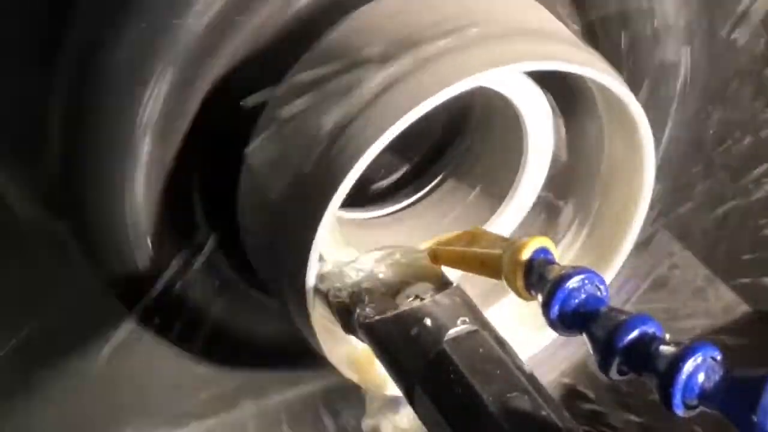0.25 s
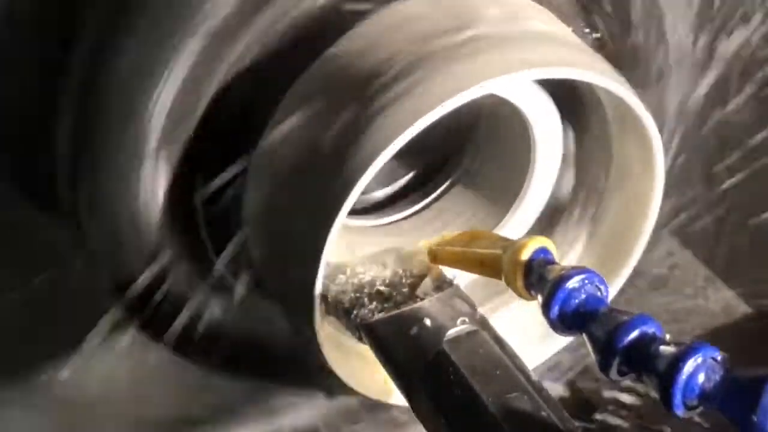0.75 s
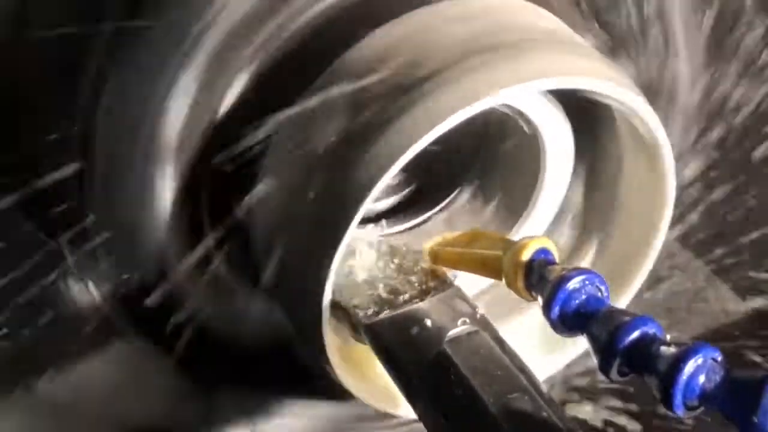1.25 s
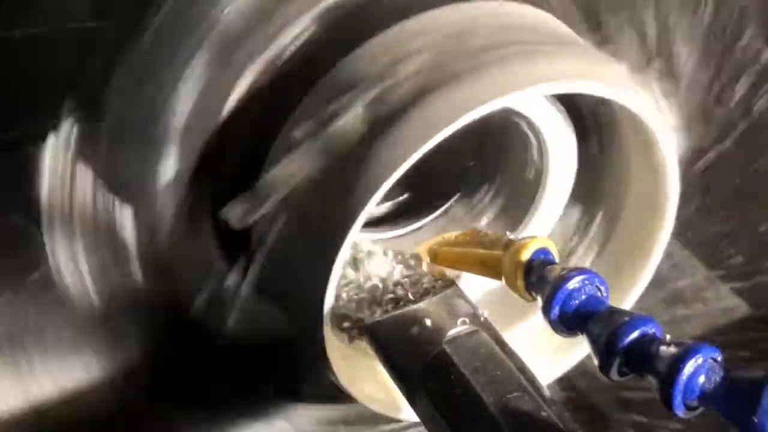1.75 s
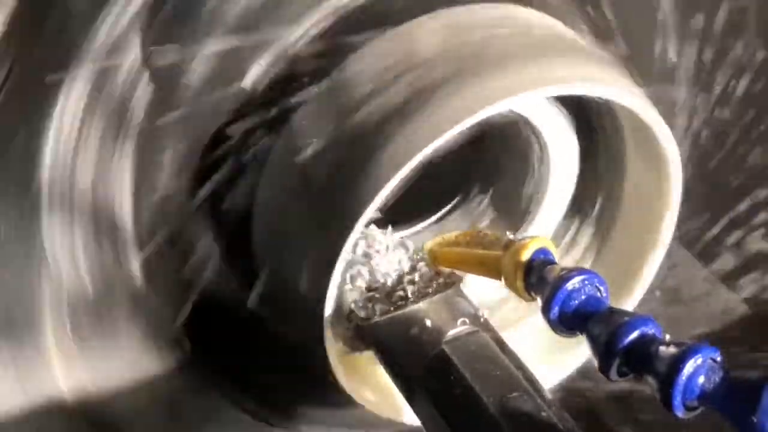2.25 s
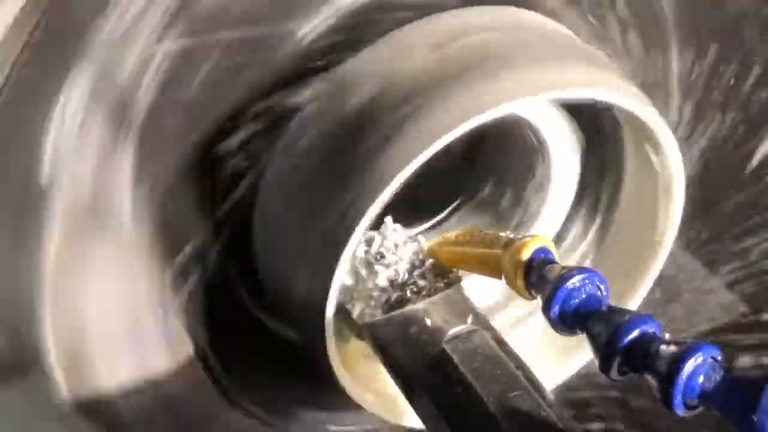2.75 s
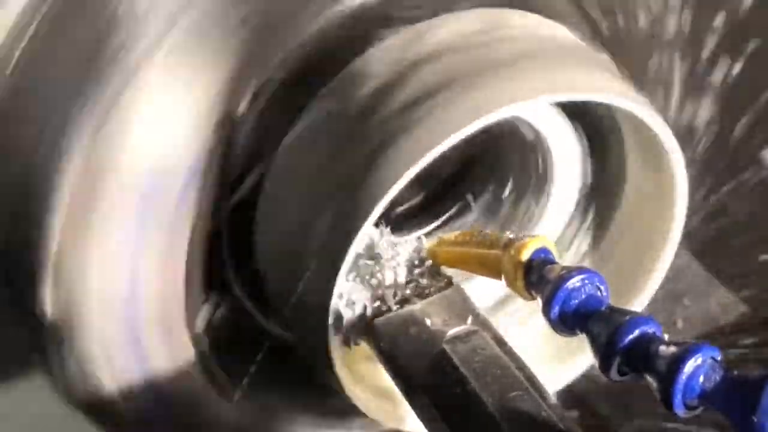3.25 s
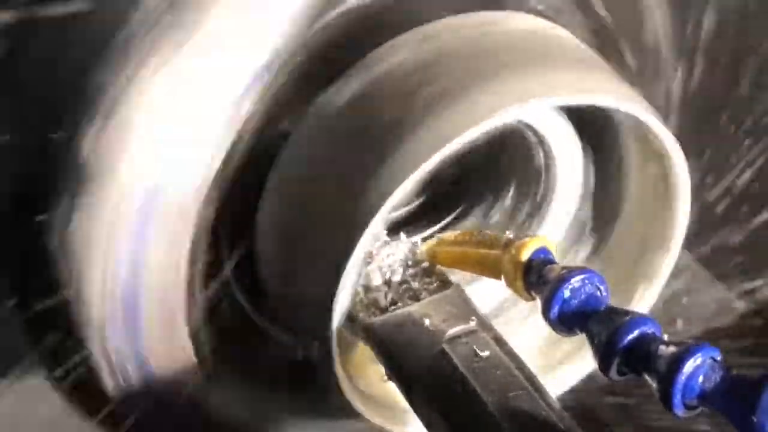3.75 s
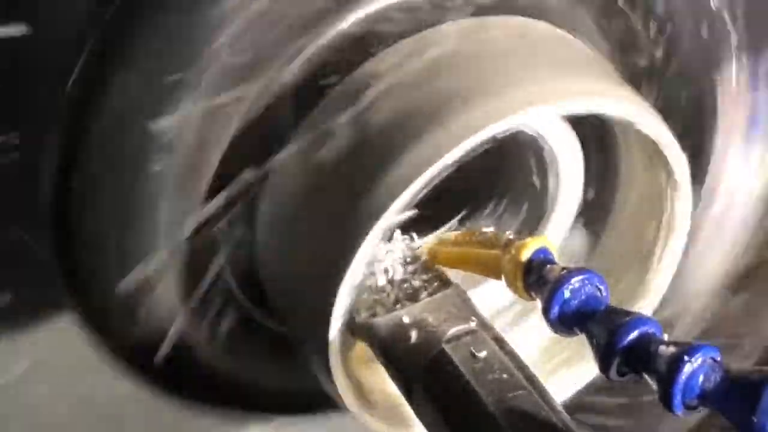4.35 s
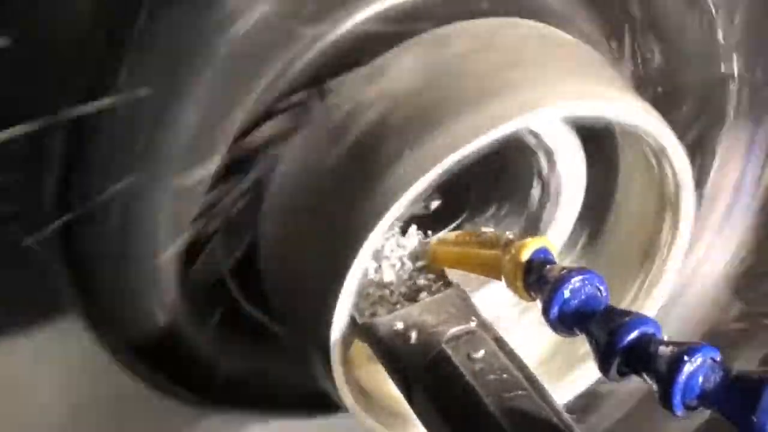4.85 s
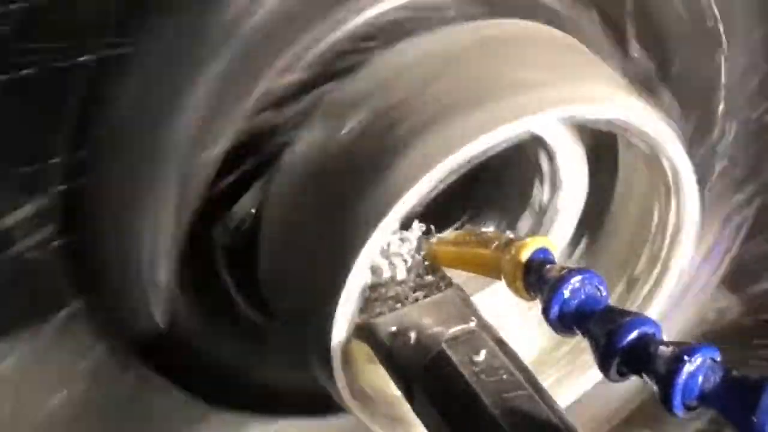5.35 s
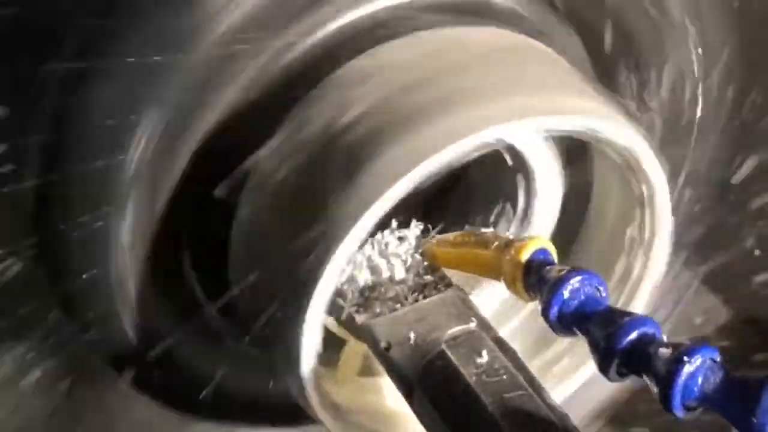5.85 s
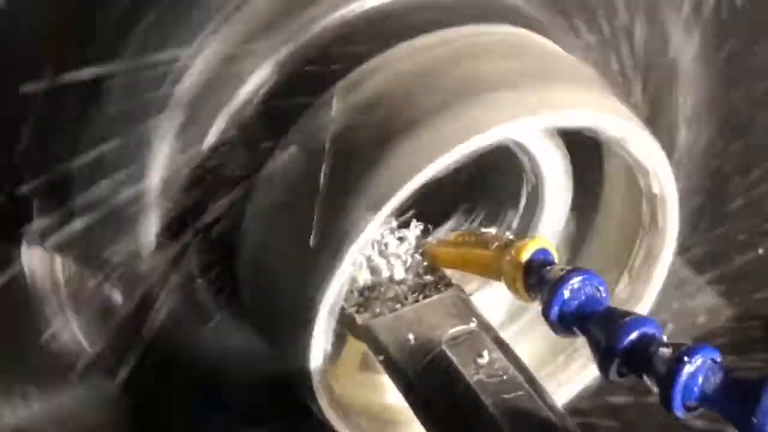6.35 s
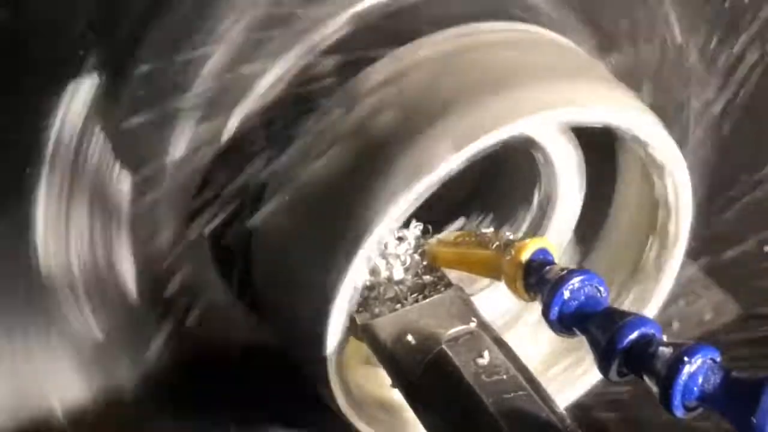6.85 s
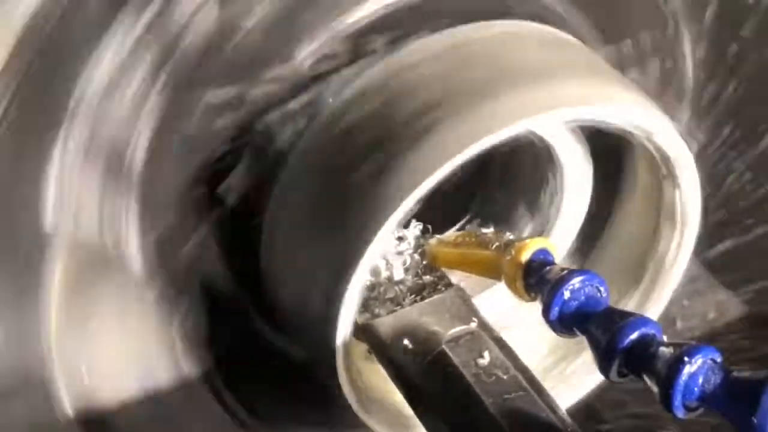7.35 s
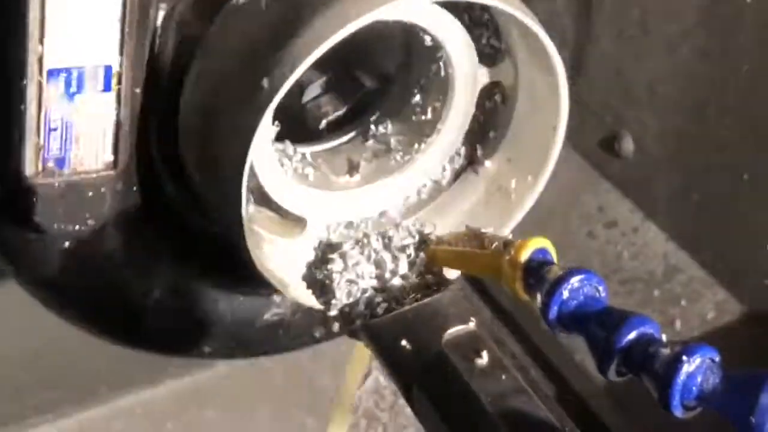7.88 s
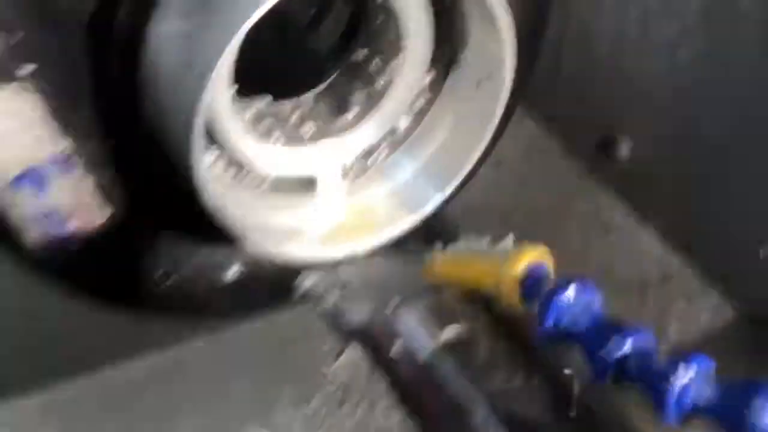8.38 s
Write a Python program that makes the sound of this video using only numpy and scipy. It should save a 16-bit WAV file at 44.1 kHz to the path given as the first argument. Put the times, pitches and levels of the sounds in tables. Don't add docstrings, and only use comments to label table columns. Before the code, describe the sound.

A cutting tip rasps fast inside a spinning metal ring, stuttering and surging, then a thin whistling chatter note rises near the end above machine hum.

```python
import sys
import numpy as np
from scipy import signal
from scipy.fft import rfft, irfft
from scipy.io import wavfile
from scipy.ndimage import uniform_filter1d

SR = 44100
rng = np.random.default_rng(int(sys.argv[2]) if len(sys.argv) > 2 else 0)


def dump(signal):
    limited = np.clip(np.atleast_2d(signal).T, -1, 1)
    pcm = np.round(limited * 32767).astype(np.int16)
    wavfile.write(sys.argv[1], SR, pcm)


def how_loud(loudness_db):
    steps = np.asarray(loudness_db, float) / 20
    return 10 ** steps


N = 380141
T = np.arange(N) / SR
TURN = 1579

# [t/s, cut level/dB, skip depth/dB, angle of renewed bite/turns]
FEED_CURVE = [(0, -28, 2.5, .85), (.3, -24.8, 3.5, .75), (.6, -26.2, 2.5, .6), (1.5, -27, 28, .97),
              (2.0, -27, 18, .91), (2.5, -24.8, 15, .8), (3.3, -27, 14, .74), (3.47, -26.5, 2.2, .55),
              (4.1, -23.8, 2.5, .55), (4.4, -27.5, 3, .58), (5.07, -31.3, 2.2, .48), (5.13, -28.5, 3, .46),
              (5.52, -25.1, 2.6, .51), (5.78, -27, 3, .55), (6.95, -28.6, 1.5, .6), (7.35, -33.5, 3, .45),
              (8.0, -32, 2.2, .39), (8.62, -25.5, 3, .48)]
# [middle t/s, half length/s, level/dB, extra skip/dB, later bite/turns]
SLACKENINGS = [(1.905, .045, -11, .1, .05), (2.745, .105, -5.5, 7.5, .21), (3.42, .04, -2.2, 9, .1),
               (4.235, .075, -6.5, 19, .44), (4.46, .04, -3, 1.2, .03), (4.605, .04, -2.2, 12, .1),
               (4.725, .05, -2.2, 10, .03), (5.875, .085, -10.5, 13, .52), (5.96, .07, -4.5, .1, .15),
               (6.375, .045, -4.5, 17, .1), (7.05, .05, -2.2, 1.2, .1), (7.48, .06, -4, .1, .2),
               (7.722, .06, -6.5, .1, .05)]
# [middle t/s, half length/s, level/dB, extra skip/dB]
DIGS = [(.634, .022, 6.5, .1), (.669, .022, 6, -7), (1.54, .065, 8.5, .1), (1.645, .03, 4.5, .1),
        (1.83, .07, 11.3, -10), (3.0, .195, 6.5, -2.2), (3.1, .06, .3, 5), (3.328, .05, 8, -5),
        (4.53, .07, 5, 5), (6.255, .265, 4.3, .6), (6.305, .06, 4, 8), (7.18, .1, 1.5, .1),
        (7.6, .11, 3, 1.2), (8.59, .13, 6, .6)]
# [start t/s, end t/s, depth/dB]
BACK_OFFS = [
    (.68, 1.525, 40),
    (1.685, 1.822, 30),
    (3.148, 3.29, 25),
    (4.61, 4.695, 15),
    (6.453, 6.497, 15),
]
# [middle t/s, depth/dB]
CHIP_JAMS = [
    (5.792, 11),
    (7.1024, 13),
    (7.2455, 17),
    (7.3164, 15),
    (7.3518, 11),
    (7.6022, 8),
    (7.6726, 11),
    (8.2009, 6),
]
# [t/s, thinness/-1..1, repeating share of scrape/0..1, freedom from packed chips/-1..1]
WALL_CURVE = [(0, -.3, .4, .9), (.6, -.25, .35, .45), (1.55, -.99, .6, -.99), (1.85, -.8, .6, -.45),
              (2.1, -.25, .99, -.15), (2.7, -.15, .95, -.23), (2.87, -.2, .4, -.23), (3.35, .01, .4, .1),
              (3.6, .15, .87, .4), (4.1, -.4, .75, .3), (4.5, -.5, .6, -.1), (4.85, -.1, .96, .95),
              (5.45, .2, .8, .7), (6.05, -.48, .36, -.05), (6.4, -.4, .45, -.3), (6.68, .85, .95, .99),
              (8.33, .95, .97, .99), (8.62, .01, .7, -.46)]
# [f/Hz, width/Hz,
# level/dB]
RING_MODES = [(787, 15, -2.5), (845.8, 7.6, 1.5), (988, 47, -0.5), (1254, 77, 0), (1405, 36.5, 3),
              (1705, 24, 1.2), (2381, 46, -1)]
# [f/Hz, width/Hz, level/dB]
BAR_MODES = [(3005, 45, -5), (3245, 55, -1), (3430, 65, -1.5), (3770, 50, -6), (4250, 60, -4),
             (4400, 90, -2), (4730, 60, -6), (4900, 120, -1), (5130, 170, -4), (5560, 60, -9),
             (6320, 110, -5), (7140, 80, -4)]
# [f/Hz, width/Hz, level/dB]
TIP_MODES = [(7820, 240, -3), (8430, 260, -1), (9280, 146, 1), (10340, 170, -0.5), (11700, 160, -12),
             (13820, 140, 1.5), (14100, 330, 0.5), (16200, 320, 1)]
# [f/Hz, width/Hz, level/dB]
POST_MODES = [(500, 30, -7.5), (680, 23, 2), (1884, 65, -7.5), (2372, 46, 3.5)]
# [f/Hz, density/dB per Hz]
RUB_SPECTRUM = [(500, -43), (1200, 2), (2200, -13.5), (2800, -7), (3300, -1.5), (5200, 4), (5900, -2.5),
                (7000, 1), (9000, -14), (12300, -13), (15500, -7)]
# [f/Hz, depth/0..1, angle/turns]
BEAMING = [(1200, .2, .9), (1700, .4, .4), (2380, .3, .5), (3005, .6, .55), (3245, .4, .2), (3430, .5, .2),
           (3770, .5, .85), (4300, .45, .62), (4900, .7, .83), (5150, .6, .95), (5560, .4, .1),
           (6320, .3, .05), (7140, .7, .62), (8200, .15, 0), (9250, .6, .35), (10300, .5, .55),
           (14000, .25, 0)]
# [f/Hz, gain/dB]
THINNING_GAIN = [(3000, 1), (3250, 6), (3430, -3), (3770, 1), (4300, -6), (4720, 5), (4900, -3), (5200, 3),
                 (6320, 1.5), (7140, -4)]
# [t/s, level/dB]
CHATTER_CURVE = [(7.05, -56), (7.162, -40), (7.264, -46), (7.39, -32.5), (7.67, -25), (7.79, -27.5),
                 (7.95, -24.5), (8.14, -27), (8.39, -48)]
# [t/s, level/dB]
ORDER_CURVE = [(7.7, -51), (7.742, -54), (7.848, -53), (7.994, -37), (8.09, -45), (8.528, -47),
               (8.568, -40), (8.62, -42)]
# [t/s, level/dB]
LOW_MODE_CURVE = [(7.3, -59), (7.386, -60), (7.45, -44), (7.47, -38), (7.51, -67), (7.6, -56)]
# [f/Hz, density/dB per Hz]
ROAR_SPECTRUM = [(30, -32.5), (100, -53), (160, -21), (235, -7.5), (300, -15), (400, -10), (500, -1),
                 (620, -10.5), (780, -15.5), (1400, -20), (4500, -20.5), (5400, -25), (8000, -28),
                 (15800, -50)]
# [f/Hz, width/Hz, level/dB]
CASING_MODES = [(1180, 120, -5), (2010, 70, -7), (2830, 60, -10), (3400, 200, -8), (4440, 120, -5),
                (4850, 90, -7), (6320, 220, -14), (7150, 130, -12), (9300, 180, -16), (14100, 200, -21)]
# [f/Hz, rms/dB]
MACHINE_LINES = [(403.7, -53.5), (516.8, -58.5), (1114, -53), (1211, -62.5), (2013, -57), (2234, -62.5),
                 (2832, -63), (3101, -58), (3235, -84), (3370, -65), (3639, -62), (4447, -59), (4850, -58),
                 (134.6, -73)]


def cut():
    force = contact()
    thinness, share, free = play(WALL_CURVE)
    share = np.clip(share, 0, 1)
    body_db, fizz_db = -2.5 + 6.5 * free, -.4 + 4.9 * free
    skip_db = feed()[1]
    steady = np.clip(1 - skip_db / 16, 0, 1)

    def drive(share_factor):
        repeating = np.clip(share * share_factor, 0, 1)
        old = marks(.89, slip_samples=9.0)
        fresh = rng.standard_normal(N)
        return force * (np.sqrt(repeating) * old + np.sqrt(1 - repeating) * fresh)

    def modes(table, push, thinness=0):
        total = 0
        for k, (hz, width_hz, db) in enumerate(table):
            level = how_loud(db + thinness * read(THINNING_GAIN, hz) + 1.4 * drift(3))
            swing = 1 + 1.06 * steady * beam(hz)
            total = total + (-1) ** k * level * swing * mode(push, hz, width_hz)
        power = sum(how_loud(db) ** 2 * width_hz for _, width_hz, db in table)
        return total / np.sqrt(power * np.pi / SR)

    ring_push, bar_push = drive(1.1), drive(1.05)
    tip_push, rub_push = drive(.5), drive(.85)
    tip_push = tip_push * (force / np.std(force)) ** .2
    ring = how_loud(-12.5 + body_db) * modes(RING_MODES, ring_push)
    bar = how_loud(-2.0) * modes(BAR_MODES, bar_push, thinness)
    tip = how_loud(-11.5 + fizz_db) * modes(TIP_MODES, tip_push)
    rub = how_loud(-6.0 + .5 * fizz_db) * evened(colour(rub_push, RUB_SPECTRUM)) * np.std(rub_push)
    post = how_loud(-18.0) * (1 - share) * modes(POST_MODES, tip_push)
    return ring + bar + tip + rub + post


def contact():
    level_db, skip_db, angle, arc = feed()
    lift_turns, settle_turns = .2, .13
    bite_turns = np.maximum(.12 - .0036 * skip_db, .02)
    ahead = (angle - np.arange(N) / TURN) % 1
    lifted = np.clip((arc - ahead) / lift_turns, 0, 1) * np.clip(ahead / bite_turns, 0, 1)
    lost_db = 1.04 * skip_db * lifted
    shock_db = .011 * np.minimum(skip_db, 26) ** 2 * np.exp(-(1 - ahead) / settle_turns)
    grains_db = 1.0 * evened(uniform_filter1d(rng.standard_normal(N), size=40))
    bumps_db = 1.26 * evened(uniform_filter1d(marks(1.0), size=100))
    return how_loud(level_db - lost_db + shock_db + grains_db + bumps_db)


def feed():
    level_db, skip_db, angle = play(FEED_CURVE)
    level_db = level_db + slack_db()
    for s, half_s, _, more_db, later in SLACKENINGS:
        early = nudge(s - .2 * half_s, half_s)
        skip_db = skip_db + more_db * early
        angle = angle + later * np.minimum(3 * nudge(s, half_s), 1)
    for s, half_s, db, more_db in DIGS:
        level_db = level_db + db * nudge(s, half_s)
        skip_db = skip_db + more_db * nudge(s, half_s)
    leave_s, enter_s, graze_s = .025, .015, .055
    for start, end, db in BACK_OFFS:
        level_db = level_db - db * np.clip(np.minimum((T - start) / leave_s, (end - T) / enter_s), 0, 1)
        graze_db = min(db, 27) * np.clip(1 + np.minimum(T - start, end - T) / graze_s, 0, 1)
        level_db = level_db - .15 * graze_db
        skip_db = skip_db + .52 * graze_db
    skip_db = np.clip(skip_db, 0, 30)
    arc = .33 + .016 * skip_db
    return level_db, skip_db, angle, arc


def slack_db():
    return sum(db * nudge(s, half_s) for s, half_s, db, *_ in SLACKENINGS)


def nudge(middle_s, half_s):
    longest_ramp_s = .08
    return np.clip((half_s - abs(T - middle_s)) / min(half_s, longest_ramp_s), 0, 1)


def marks(keep, slip_samples=0.0):
    keep = np.clip(keep, 0, .98)
    fresh = rng.standard_normal((N // TURN + 31, TURN))
    kept = signal.lfilter([1], [1, -keep], fresh, axis=0)[30:].ravel()
    slip = np.round(slip_samples * drift(1)).astype(int)
    return evened(kept[np.clip(np.arange(N) + slip, 0, N)])


def beam(hz):
    _, depth, angle = min(BEAMING, key=lambda row: abs(row[0] - hz))
    one_turn = depth * np.cos(2 * np.pi * (np.arange(TURN) / TURN - angle))
    return np.resize(one_turn, N)


def jams():
    half_s, ramp_s = .0038, .0015
    return how_loud(-sum(db * np.clip((half_s - abs(T - s)) / ramp_s, 0, 1) for s, db in CHIP_JAMS))


def swell(rows, hz, throb=0.19):
    start, end = rows[0][0], rows[-1][0]
    fade = np.interp(T, [start, start + .05, end - .03, end], [0, 1, 1, 0])
    phase = 2 * np.pi * np.cumsum(hz + 1.6 * drift(7)) / SR
    turn = 1 + throb * np.cos(2 * np.pi * np.arange(N) / TURN)
    return fade * turn * how_loud(play(rows)[0]) * np.sqrt(2) * np.sin(phase)


def self_excited_notes():
    sag = how_loud(1.4 * slack_db())
    chatter = sag * swell(CHATTER_CURVE, 1234)
    order = swell(ORDER_CURVE, 49 * SR / TURN, throb=.05)
    return chatter + order + swell(LOW_MODE_CURVE, 985.0)


def enclosure(x):
    t60_s = .059
    t = np.arange(8000) / SR
    tail = rng.standard_normal(8000) * how_loud(-60 * t / t60_s) * (t > .002)
    return signal.oaconvolve(x, tail / np.linalg.norm(tail))[:N]


def machine():
    density = how_loud(read(ROAR_SPECTRUM, np.fft.rfftfreq(N, 1 / SR)))
    roar = evened(irfft(rfft(rng.standard_normal(N)) * density, N))
    whirr = .6 * marks(.6) + .8 * rng.standard_normal(N)
    casing = evened(sum(how_loud(db) * mode(whirr, hz, width_hz) for hz, width_hz, db in CASING_MODES))
    lines = 0
    for hz, db in MACHINE_LINES:
        level = how_loud(db + 2.0 * drift(14)) * np.sqrt(2)
        cycles = np.cumsum(hz + 1.19 * drift(4)) / SR + rng.random()
        lines = lines + level * np.sin(2 * np.pi * cycles)
    return how_loud(-42.0 + .5 * drift(5)) * (roar + how_loud(-5.0) * casing) + lines


def mode(x, hz, width_hz):
    r = np.exp(-np.pi * width_hz / SR)
    return 2 * signal.lfilter([1 - r], [1, -r * np.exp(2j * np.pi * hz / SR)], x).real


def colour(x, points):
    hz = np.linspace(0, SR / 2, 513)
    gain = how_loud(read(points, hz)) * (hz < SR / 2)
    return signal.oaconvolve(x, signal.firwin2(301, hz, gain, fs=SR), "same")


def read(points, hz):
    f, value = np.transpose(points)
    return np.interp(np.log(hz + 1), np.log(f + 1), value)


def play(rows):
    s, *columns = np.transpose(rows)
    return [np.interp(T, s, c) for c in columns]


def drift(rate_hz):
    rates_hz = rate_hz * np.geomspace(.1, 1, 12)
    coarse = sum(np.sin(2 * np.pi * (f * T[::256] + rng.random())) for f in rates_hz)
    return signal.upfirdn(signal.windows.triang(511), evened(coarse), up=256)[255:N + 255]


def evened(x):
    return x / np.sqrt(np.mean(x ** 2) + 1e-20)


def scene():
    scrape = jams() * cut()
    notes = np.sqrt(jams()) * self_excited_notes()
    mono = scrape + how_loud(-23.0) * enclosure(scrape) + notes + machine()
    return np.array([mono, mono])


def roll_off(x):
    return signal.sosfilt(signal.butter(12, 16500, fs=SR, output="sos"), x)


def record(dry):
    bass_cut = signal.butter(1, 90, "highpass", fs=SR, output="sos")
    thin = signal.sosfilt(bass_cut, dry)
    band_limit = signal.firwin(511, 15750, window=("kaiser", 9), fs=SR)
    mix = signal.oaconvolve(thin, band_limit[None], "same")
    return roll_off(mix)


dry = scene()
out = record(dry)
dump(out)
```